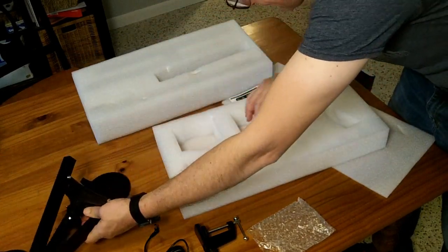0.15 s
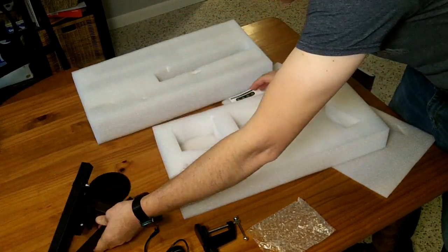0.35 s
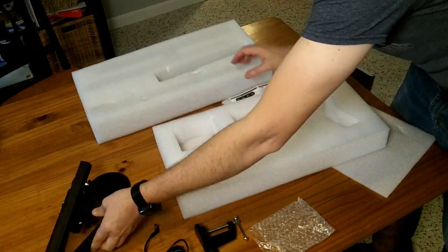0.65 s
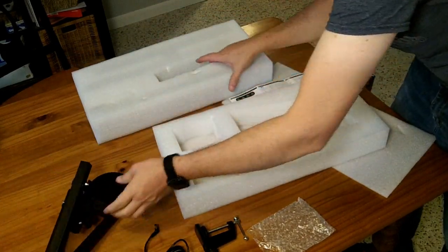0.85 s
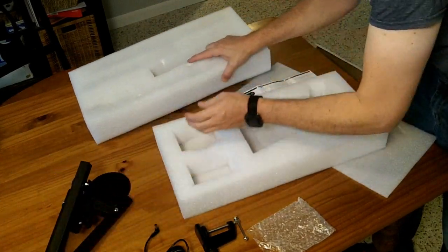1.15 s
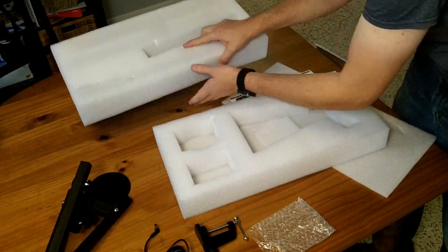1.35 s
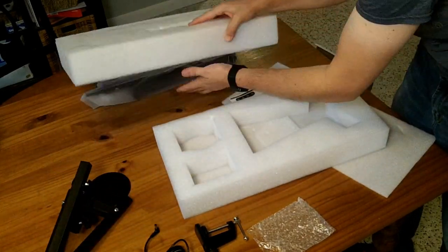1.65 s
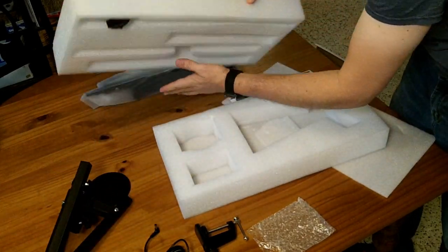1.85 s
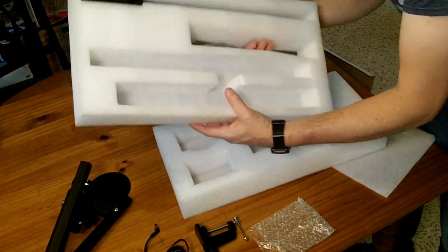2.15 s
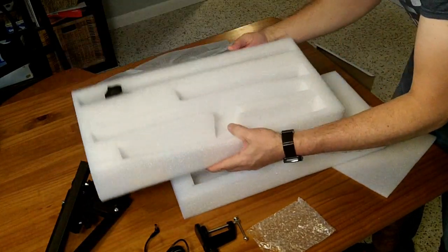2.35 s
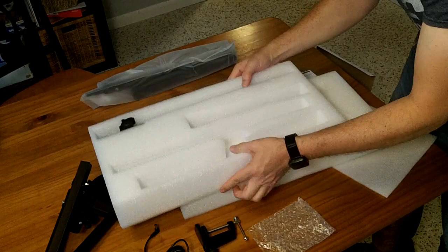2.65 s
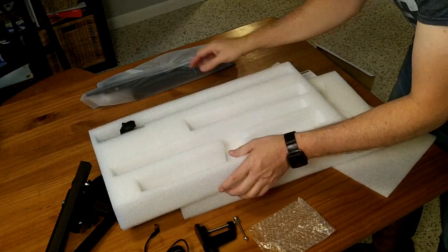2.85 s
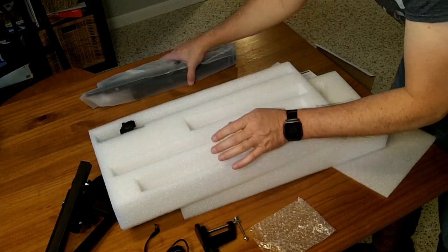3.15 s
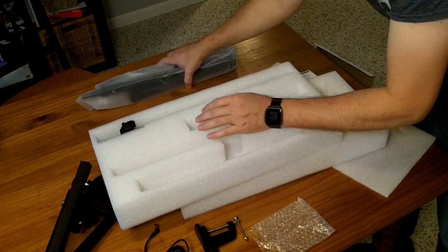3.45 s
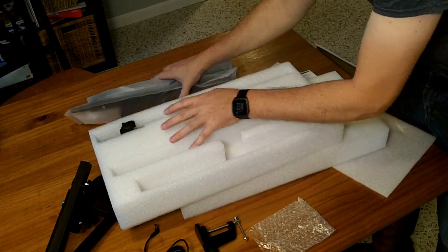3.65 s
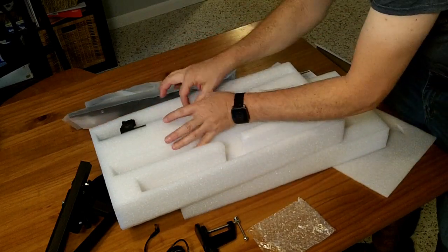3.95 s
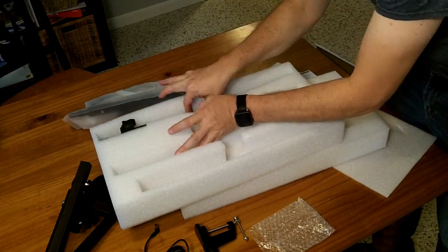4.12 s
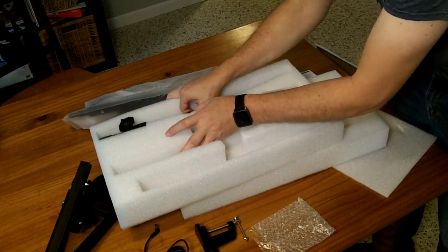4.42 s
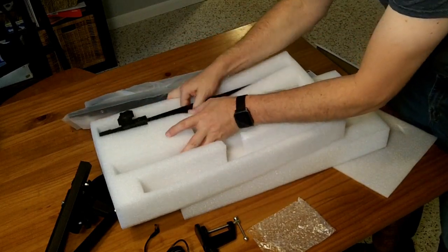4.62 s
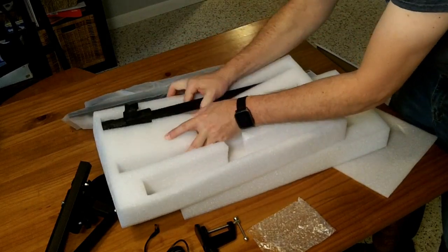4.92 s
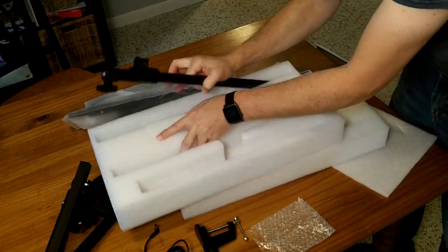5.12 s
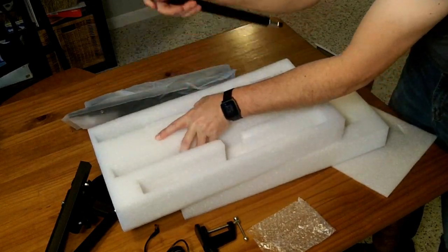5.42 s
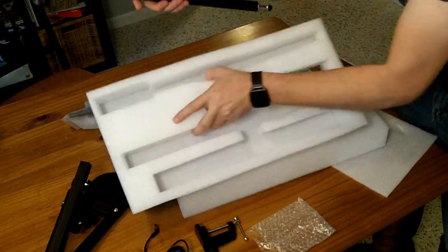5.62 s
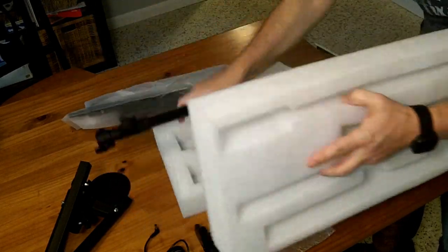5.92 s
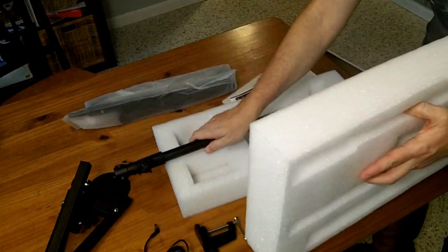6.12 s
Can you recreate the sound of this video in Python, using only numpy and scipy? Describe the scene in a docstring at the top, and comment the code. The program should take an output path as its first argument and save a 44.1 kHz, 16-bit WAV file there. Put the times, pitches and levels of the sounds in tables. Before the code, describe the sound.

A metal foot scrapes briefly across a wooden table, stops, then knocks down and rattles to rest. Hands then lift and turn foam packing blocks: crisp crackly rubs, small squeaks, soft hollow bumps and a faint low groan. The sharpest snaps come in the later half, then it goes nearly quiet. Close microphone, small live room, slightly muffled treble, faint hiss.

```python
"""Hands lift, turn and press foam blocks indoors: dense random slips crackle, filtered noise bursts snap,
decaying tones bump softly, and slow stick-slip pulses groan on the wood.
First a metal stand drags over a wooden table (filtered slips), then knocks and rocks to rest (pulses into modes).
A small room rings after it all (decaying noise); the sound is weak above 7 kHz, over a faint hiss."""
import sys
import numpy as np
from scipy import signal
from scipy.fft import rfft, irfft, next_fast_len
from scipy.io import wavfile
from scipy.ndimage import uniform_filter1d

SR = 44100
rng = np.random.default_rng(int(sys.argv[2]) if len(sys.argv) > 2 else 0)


def volts(x):
    """Linear amplitude factor 10**(x/20) for a level x in dB, scalar or array-like."""
    e = np.asarray(x, float) / 20
    return 10 ** e


def transcribe(u):
    """Save the signal u as a 16-bit wav file named by the first command-line argument.

    u: samples, shape (n,) or (channels, n), limited to [-1, 1]; the rate is SR.
    q: integer samples, one column per channel.
    """
    v = np.clip(np.atleast_2d(u).T, -1, 1)
    q = np.round(v * 32767).astype(np.int16)
    wavfile.write(sys.argv[1], SR, q)


N = 276683
T = np.arange(N) / SR


def level(x, db):
    """Scale to an rms level."""
    return x * volts(db) / np.sqrt(np.mean(x ** 2))


def band(x, lo_hz, hi_hz, order=2):
    """Causal band-pass."""
    return signal.sosfilt(signal.butter(order, [lo_hz, min(hi_hz, .45 * SR)], "band", fs=SR, output="sos"), x)


def colour(x, shape):
    """Filter by a gain curve of (Hz, dB) points, straight in log frequency."""
    hz, db = np.transpose(shape)
    size = next_fast_len(len(x))
    f = np.arange(size // 2 + 1) * SR / size + 1
    gain = volts(np.interp(np.log(f), np.log(hz), db))
    return irfft(rfft(x, size) * gain, size)[:len(x)]


def decay(t, t60_s):
    """Exponential decay, 60 dB in t60_s."""
    return volts(-60 * t / t60_s)


def slips(rate_hz, scatter_db):
    """Tiny random slips; a few are much larger than most."""
    size = volts(np.minimum(scatter_db * rng.exponential(size=N), 12))
    return (rng.random(N) < rate_hz / SR) * size * rng.standard_normal(N)


def flicker(rate_hz, depth_db):
    """A gain that wanders as the contact grips and lets go."""
    k = int(SR / rate_hz)
    steps = np.repeat(rng.standard_normal(N // k + 1), k)
    return volts(depth_db * uniform_filter1d(steps, k // 2)[:N])


def ring(x, modes):
    """Decaying modes of an object; neighbours swing in opposite sense."""
    out = 0
    for k, (hz, db, t60_s) in enumerate(modes):
        r = np.exp(-np.log(1000) / (max(t60_s, .004) * SR))
        w = 2 * np.pi * hz / SR
        mode = signal.lfilter([0, r * np.sin(w)], [1, -2 * r * np.cos(w), r * r], x)
        out = out + (-1) ** k * volts(db) * mode
    return out


def add(out, s, piece):
    """Mix a piece in at s seconds."""
    i = int(s * SR)
    out[i:i + len(piece)] += piece[:N - i]


def stroke(s, length_s, rise_db_s, fall_db_s, swell_db=0):
    """Gain of one movement: it rises to s, holds or swells for its length, then dies away."""
    hold_db = swell_db * np.clip((T - s) / max(length_s, .005), 0, 1)
    rise_db = rise_db_s * np.maximum(s - T, 0)
    fall_db = fall_db_s * np.maximum(T - s - length_s, 0)
    return volts(hold_db - rise_db - fall_db)


# crackle spectrum of slipping cells: f/Hz, level/dB per Hz
CELL_SPECTRUM = [(700, -28), (1200, -6), (1920, -5), (2500, 2), (4740, 1.5), (6500, -3.5), (11000, 1),
                 (16000, -31)]
# strokes of foam on foam, hand or wood: t/s, length/s, crackle level/dB, swell over the stroke/dB,
# rustle of the block re crackle/dB
FOAM_STROKES = [(0.434, 0.082, -54.5, 1, -3), (0.582, 0.17, -50, -12, -4), (0.942, 0.084, -47, 3, -3),
                (1.06, 0.1, -56.5, 6, 0), (1.172, 0.21, -40, 2, -4.5), (1.576, .06, -59, -6, -6),
                (2.103, 0.1, -42.5, -0.5, -4), (2.291, 0.077, -35, -3, -4), (2.418, 0.061, -43, 6.5, -8.5),
                (2.562, .04, -48, 1, -7), (2.617, 0.12, -41, 2, -4), (2.805, 0.068, -40, -1, -5),
                (2.964, 0.061, -56, 0, 4), (3.224, 0.064, -40, 0.5, -8.5), (3.345, 0.058, -46.5, 2, -8.5),
                (3.521, .17, -52, 12.5, -38), (3.71, 0.17, -43, 1.5, -10.5), (4.008, 0.023, -51, 1, -4),
                (4.062, 0.033, -37, -4.5, -7), (4.113, 0.26, -43.5, 4, -3.5),
                (4.431, 0.054, -34.5, -2, -2.5), (4.562, 0.11, -42.5, -5.5, -5.5),
                (4.71, 0.29, -52.5, 2.5, -4), (5.002, 0.11, -54.5, 14, -4), (5.16, 0.017, -29.5, 1.5, -0.5),
                (5.18, 0.22, -41, 4, -4), (5.584, 0.12, -49.5, 5.5, -5), (5.89, 0.21, -59, -5, 4),
                (6.11, 0.028, -56.5, 3, 3)]
GRIP_DB_S, RELEASE_DB_S = 602, 185  # how fast a stroke takes hold and lets go
HOLLOW_DB, HOLLOW_GROWTH_DB_PER_DB = -33.5, 0.55  # hollow body, dB it gains per dB of crackle
RESTING_DB = -65  # hands that barely move


def foam():
    """Cells slip by the thousand: a bright crackle, and duller layers from the block that carries it."""
    crackle = level(colour(slips(7000, 0.37), CELL_SPECTRUM) * flicker(45, 1.14), 0)
    rustle = level(band(slips(4000, 0.61), 422, 2630) * flicker(90, 2.4), 0)
    hollow = level(band(slips(2500, 2.6), 185, 580) * flicker(60, 2.5), 0)
    bright_power = dull_power = volts(RESTING_DB) ** 2
    for s, length_s, db, swell_db, rustle_db in FOAM_STROKES:
        power = (volts(db) * stroke(s, length_s, GRIP_DB_S, RELEASE_DB_S, swell_db)) ** 2
        bright_power = bright_power + power
        dull_power = dull_power + power * volts(rustle_db) ** 2
    bright, dull = np.sqrt(bright_power), np.sqrt(dull_power)
    body = volts(HOLLOW_DB) * bright ** HOLLOW_GROWTH_DB_PER_DB * hollow
    uneven = flicker(22, 0.99)  # no stroke is even
    return uneven * (bright * crackle + body + dull * rustle)


# cells let go together, in short cracks and longer tears: t/s, level before decay/dB, centre f/Hz, t60/s
FOAM_SNAPS = [(1.176, -37, 2220, 0.098), (1.351, -33.5, 3050, 0.093), (1.571, -46.5, 2850, .048),
              (1.607, -47, 2500, 0.041), (1.902, -51, 3250, .037), (2.0786, -39.5, 3320, 0.063),
              (2.146, -38, 3050, 0.099), (2.281, -39, 2980, 0.061), (2.379, -29.5, 3870, 0.045),
              (2.621, -33.5, 3480, .07), (2.8, -36, 3000, 0.16), (3.021, -44, 1630, 0.13),
              (3.196, -45, 3960, .087), (3.223, -48, 3160, 0.07), (3.503, -36.5, 5200, 0.032),
              (4.057, -36, 3400, .07), (4.121, -28.5, 3160, 0.082), (4.412, -34, 4000, 0.092),
              (4.433, -29, 3300, 0.033), (4.448, -24, 3000, 0.03), (4.477, -22, 3120, 0.039),
              (4.872, -48, 4420, 0.081), (5.151, -18, 4040, 0.048), (5.177, -16.5, 2870, .02),
              (5.898, -52, 2060, 0.1), (6.234, -52.5, 3600, 0.076)]


def snaps():
    """Each snap is a noise burst of many slips that starts at once and dies away."""
    out, t = np.zeros(N), T[:8000]
    noises = rng.standard_normal((len(FOAM_SNAPS), len(t)))
    for (s, db, hz, t60_s), noise in zip(FOAM_SNAPS, noises):
        burst = level(band(noise, hz / 1.24, hz * 1.38, order=1), db)
        add(out, s, burst * decay(t, max(t60_s, .004)))
    return out


# one cell wall bursts: t/s, level before band-pass/dB, f/Hz
WALL_TICKS = [(2.2813, -25, 2400), (3.284, -24.5, 3210), (3.5029, -24, 5800), (3.6807, -22, 3720),
              (4.5282, -22, 4600), (5.0873, -35, 2880), (5.2838, -21, 4140), (5.457, -25, 5130)]
TICK_T60_S = .004


def ticks():
    """A single sharp click that rings for a few cycles."""
    out, t = np.zeros(N), T[:600]
    for s, db, hz in WALL_TICKS:
        tone = np.sin(2 * np.pi * hz * t) * decay(t, TICK_T60_S)
        add(out, s, volts(db) * band(tone, 1200, 9000, order=1))
    return out


# rubbing that settles on one resonance of the block: t/s, length/s, f/Hz, level before fades/dB
RUB_SQUEAKS = [(.948, 0.083, 2900, -52), (1.565, 0.025, 3000, -52.5), (2.147, 0.021, 1410, -40.5),
               (2.303, 0.1, 1290, -41), (2.312, 0.076, 1900, -42), (2.47, 0.057, 1110, -48),
               (3.225, 0.043, 1170, -47.5), (3.837, .069, 1220, -49.5), (4.048, 0.041, 1240, -47.5),
               (4.295, .077, 500, -44), (4.482, 0.061, 820, -53), (4.723, 0.35, 526, -60)]
SQUEAK_WIDTH_HZ = 330


def squeaks():
    """Dense slips heard through one broad resonance, swelling and fading."""
    out, grip = np.zeros(N), slips(6000, 1.9)
    for s, length_s, hz, db in RUB_SQUEAKS:
        piece = grip[int(s * SR):int((s + length_s) * SR)]
        tone = level(band(piece, hz - SQUEAK_WIDTH_HZ / 2, hz + SQUEAK_WIDTH_HZ / 2), db)
        add(out, s, tone * signal.windows.tukey(len(piece), .6))
    return out


# soft bumps of a block: t/s, level/dB, centre f/Hz, deep thud re level/dB, thud f/Hz
BLOCK_BUMPS = [(0.499, -49, 300, 1.5, 48.7), (1.385, -36.5, 510, -30, 29.8), (2.074, -32, 302, -9, 29.6),
               (2.281, -45, 323, -7, 66.5), (2.536, -41, 472, -16.5, 43), (2.618, -37.5, 224, -22, 66),
               (2.836, -40.5, 335, -15, 77.3), (2.924, -38, 225, -7.5, 47.4), (3.232, -38.5, 209, -6, 69),
               (3.372, -39, 215, -20.5, 82), (4.065, -43.5, 320, -9, 30.6), (5.152, -31, 505, -6, 30),
               (5.18, -29, 206, -13.5, 78), (5.345, -37.5, 210, -22, 60.4)]


def bumps():
    """A soft block lands: a dull knock at its own pitch over a deep thud."""
    out, t = np.zeros(N), T[:12000]
    noises = rng.standard_normal((len(BLOCK_BUMPS), len(t)))
    for (s, db, hz, deep_db, deep_hz), noise in zip(BLOCK_BUMPS, noises):
        tone = np.sin(2 * np.pi * hz * t) * decay(t, 0.053)
        brush = level(band(noise, hz / 3.1, hz * 1.54, order=1), -8) * decay(t, 0.17)
        thud = np.sin(2 * np.pi * deep_hz * t) * np.minimum(t / 0.016, 1) * decay(t, 0.45)
        add(out, s, volts(db) * (tone + brush + volts(deep_db) * thud))
    return out


# slow stick-slip slide, slip rate stepping row by row: t/s, length/s, mean slip rate f/Hz, level/dB
SLIDE_GROAN = [(3.642, 0.018, 150.6, -55), (3.716, 0.035, 142.2, -48), (3.775, 0.055, 197.4, -47.5),
               (3.863, 0.037, 161.8, -53.5)]
GROAN_RISE_DB_S, GROAN_FALL_DB_S = 314, 350


def groan():
    """Stick-slip pulses, each cycle a little different, through the hollow of the block."""
    starts, _, rates_hz, _ = np.transpose(SLIDE_GROAN)
    hz = rates_hz[np.maximum(np.searchsorted(starts - .01, T) - 1, 0)]
    gain = 0
    for s, length_s, _, db in SLIDE_GROAN:
        gain = gain + volts(db) * stroke(s, length_s, GROAN_RISE_DB_S, GROAN_FALL_DB_S)
    cycle = np.floor(np.cumsum(hz * flicker(150, 0.21)) / SR).astype(int)
    pulses = np.diff(cycle, prepend=0) * volts(2.0 * rng.standard_normal(N))
    low, middle, high = band(pulses, 75, 184), band(pulses, 306, 473), band(pulses, 527, 670)
    return gain * level(low + volts(2.5) * middle + volts(-3) * high, 0)


# metal foot on wood, bright until it catches, then duller:
# t/s, length/s, level/dB; re level: low scrape/dB, table boom/dB, edge rasp/dB
FOOT_DRAG = [(0.0, 0.143, -27.5, -3, -7, -25.5), (.165, 0.094, -37, 8.5, 4, -31)]
DRAG_RISE_DB_S, DRAG_FALL_DB_S = 1487, [893, 131.5]  # stopped dead, then coasting out
DRAG_DEEP_DB = -25  # the whole table shudders
# table top modes, free decay: f/Hz, level/dB, t60/s
TABLE_MODES = [(36.4, -27, 0.42), (69.7, -23, 0.48), (115, -10, 0.082), (150, -9, 0.093),
               (212.4, -3.5, 0.11), (253, 1, 0.069), (327, -6, 0.19), (374.6, -2.5, 0.19), (449, 2, 0.062),
               (511, -4.5, 0.093), (647, -3.5, 0.077), (735, 2, 0.053), (896, -1, 0.031), (1030, -5, 0.15),
               (1333, -1.5, 0.049)]


def drag():
    """The foot chatters over the grain and shakes the table top."""
    chatter, out = slips(12000, 1.2) * flicker(88.8, 1.0), 0
    damped_modes = [(hz, db, 0.32 * t60_s) for hz, db, t60_s in TABLE_MODES]
    scrape = level(band(chatter, 840, 2020), 0)
    low = level(band(chatter, 600, 1304), 0)
    boom = level(band(ring(chatter, damped_modes), 66, 390), 0)
    deep = level(band(chatter, 25, 89), 0)
    rasp = level(band(chatter, 2570, 4130), 0)
    for (s, length_s, db, low_db, boom_db, rasp_db), fall_db_s in zip(FOOT_DRAG, DRAG_FALL_DB_S):
        mix = scrape + volts(DRAG_DEEP_DB) * deep
        mix = mix + volts(low_db) * low + volts(boom_db) * boom + volts(rasp_db) * rasp
        out = out + volts(db) * stroke(s, length_s, DRAG_RISE_DB_S, fall_db_s) * mix
    return out


# knocks on the table: t/s, push level/dB, metal rattle re push/dB, contact/ms, click re push/dB;
# each layer also has a common gain in knocks()
TABLE_KNOCKS = [(0.1531, -23.5, -27, 0.39, 5), (0.7, -15, -16.5, 2.15, -8.5), (.728, -17, -18, 1.32, -10),
                (.755, -28.5, -33, 0.31, -20), (.78, -25.5, -25, 0.94, -22.5),
                (.803, -21.5, -28.5, 1.34, -6.5), (.826, -25, -23, 0.96, -15)]
# loose metal modes: f/Hz, level/dB, t60/s
METAL_MODES = [(2400, 7.5, .006), (3600, 19, 0.0064), (4300, -25, .008), (5100, -8, .006)]


def knocks():
    """Short pushes ring the table, hard ones click through the air; the loose metal rattles after each."""
    push, click, rattle, t = np.zeros(N), np.zeros(N), np.zeros(N), T[:9000]
    noises = rng.standard_normal((len(TABLE_KNOCKS), len(t)))
    for (s, db, metal_db, contact_ms, click_db), noise in zip(TABLE_KNOCKS, noises):
        shape = np.hanning(int(max(contact_ms, .1) * SR / 1000) + 3)
        shape = shape / shape.sum()
        add(push, s, volts(db) * shape)
        add(click, s, volts(db + click_db) * shape)
        add(rattle, s, volts(db + metal_db) * noise * decay(t, 0.18))
    wood = volts(-4.5) * ring(push, TABLE_MODES)
    snap = volts(37.0) * band(click, 120, 3200, order=1)
    metal = volts(-28.5) * ring(rattle, METAL_MODES)
    clatter = volts(12.5) * band(rattle, 500, 2000, order=1)
    return wood + snap + metal + clatter


# room decay: centre f/Hz, t60/s
ROOM_DECAY = [(150, 0.63), (600, 0.68), (2400, 0.51), (7000, 0.28)]


def room(x):
    """A short noisy tail, dying fastest in the treble."""
    t, tail = T[:SR], 0
    for hz, t60_s in ROOM_DECAY:
        tail = tail + band(rng.standard_normal(SR), hz / 2, hz * 2) * decay(t, t60_s)
    tail = tail / np.sqrt(np.sum(tail ** 2))
    return signal.fftconvolve(x, np.minimum(t / 0.015, 1) * tail)[:N]


# room air spectrum: f/Hz, level/dB per Hz
AIR_SPECTRUM = [(20, 0.5), (80, -3), (135, -9), (256, -9), (390, -8), (800, -32), (2500, -17.5),
                (6500, -20.5), (16000, -26.5)]
AIR_DB = -59.5


def air():
    """Steady background: coloured noise, strongest in the bass."""
    return level(colour(rng.standard_normal(N), AIR_SPECTRUM), AIR_DB)


CHAIN_RESPONSE = [(20, 2), (6000, 0), (7000, -5.5), (7800, -19.5), (11000, -19), (13000, -9), (16000, -52)]
# hiss spectrum: f/Hz, level/dB per Hz
HISS_SPECTRUM = [(20, -36), (6000, -37), (8500, -6.5), (15200, -3), (15500, -61)]
HISS_DB = -68  # before the dips
# narrow dips of the chain: f/Hz, width/Hz
CHAIN_DIPS = [(7950, 310), (11900, 47)]


def recording_chain(x):
    """The chain as a whole is weak above 7 kHz and hisses, with narrow dips near 8 and 12 kHz."""
    hiss = level(colour(rng.standard_normal(N), HISS_SPECTRUM), HISS_DB)
    out = colour(x, CHAIN_RESPONSE) + hiss
    for hz, width_hz in CHAIN_DIPS:
        out = signal.filtfilt(*signal.iirnotch(hz, hz / width_hz, SR), out)
    return out


def scene():
    """Table sounds fill the room more than the light foam does."""
    hands = foam() + snaps() + ticks() + squeaks() + bumps() + groan()
    table = drag() + knocks()
    echo = room(volts(-9) * table + volts(-10.5) * hands)
    return (table + hands + echo + air())[None]


def low_pass(x):
    """Removes everything above the highest recorded frequency."""
    return signal.sosfilt(signal.butter(12, 15480, fs=SR, output="sos"), x)


def record(dry):
    """Pass the scene through the whole recording chain."""
    mix = recording_chain(dry[0])
    return low_pass(mix[None])


dry = scene()
out = record(dry)
transcribe(out)
```